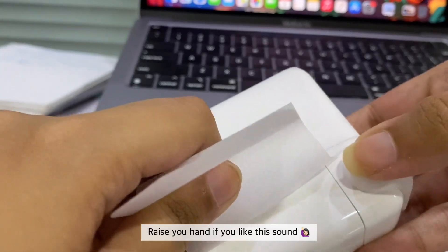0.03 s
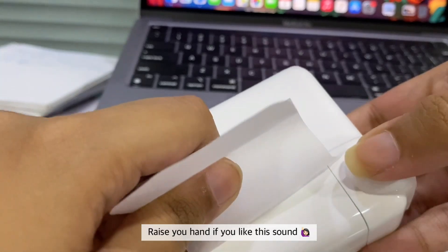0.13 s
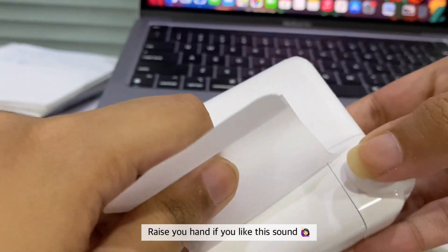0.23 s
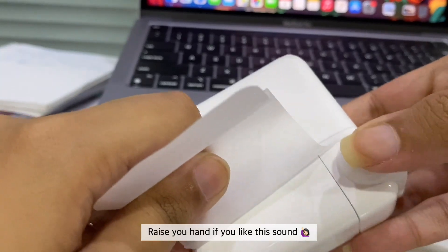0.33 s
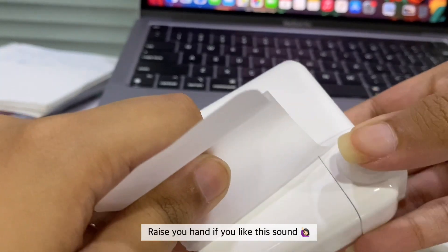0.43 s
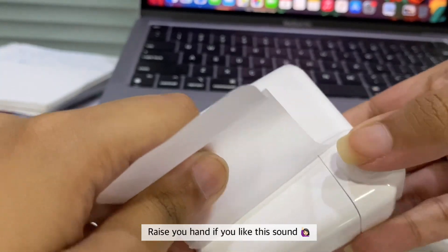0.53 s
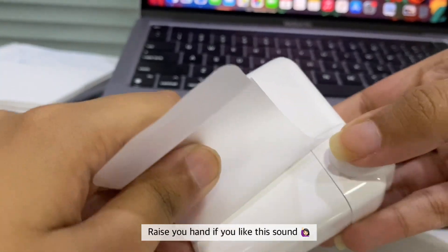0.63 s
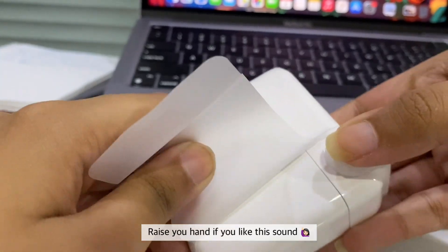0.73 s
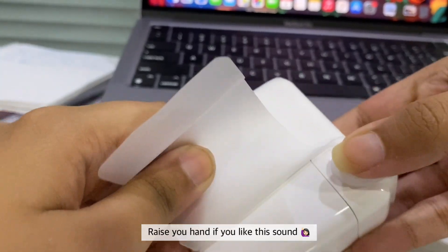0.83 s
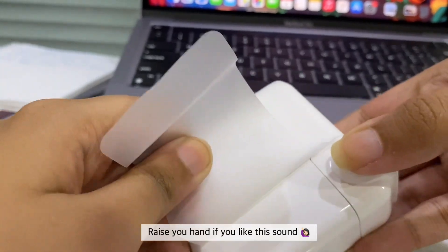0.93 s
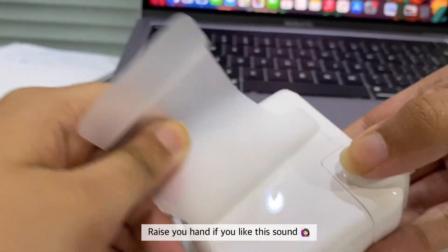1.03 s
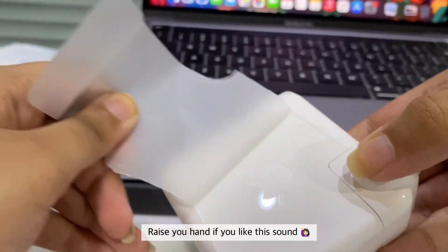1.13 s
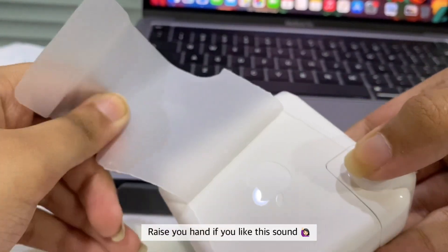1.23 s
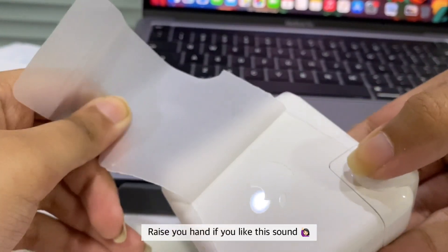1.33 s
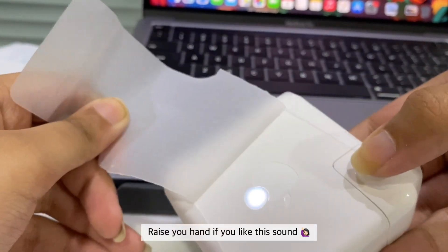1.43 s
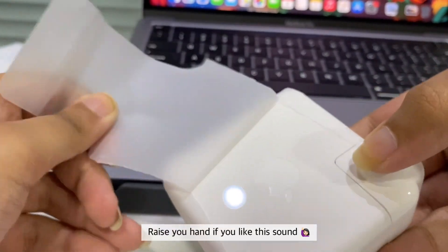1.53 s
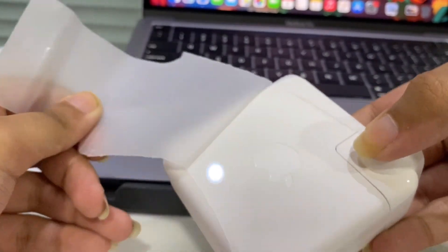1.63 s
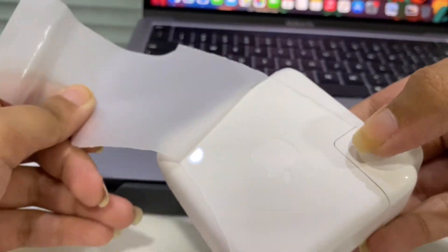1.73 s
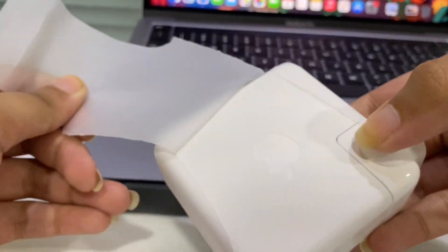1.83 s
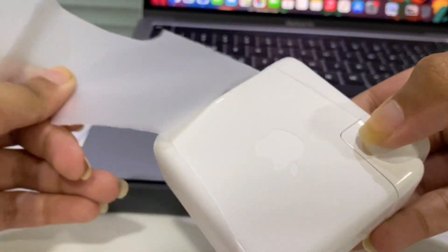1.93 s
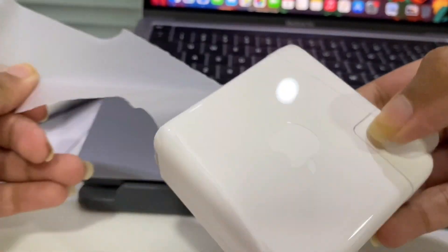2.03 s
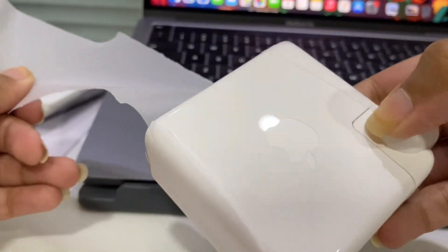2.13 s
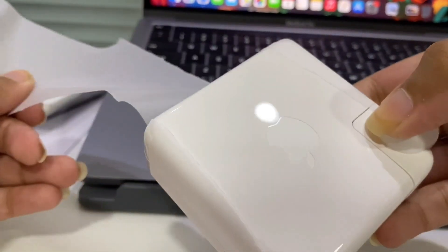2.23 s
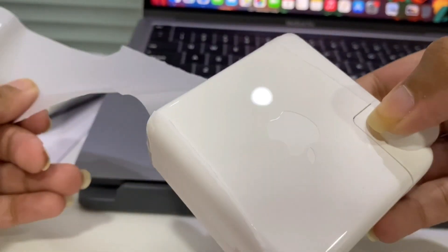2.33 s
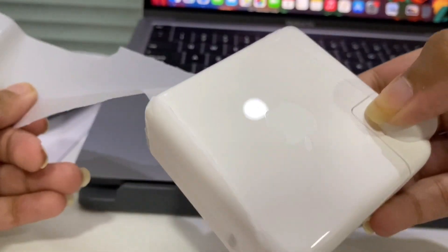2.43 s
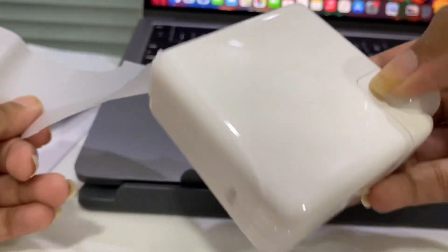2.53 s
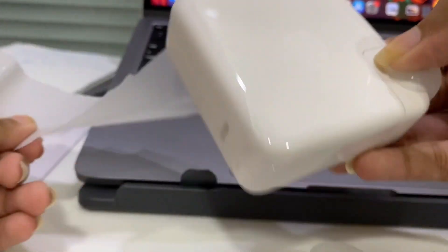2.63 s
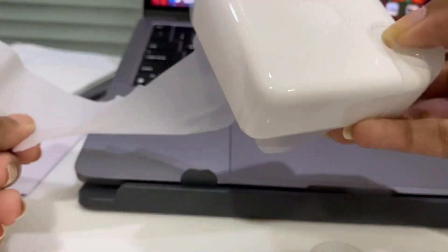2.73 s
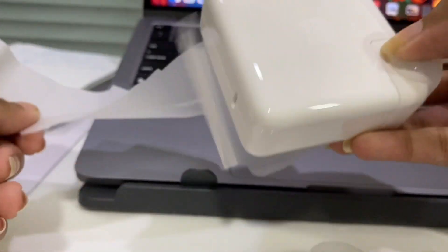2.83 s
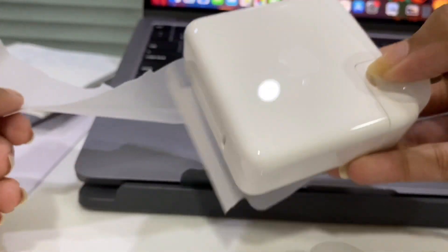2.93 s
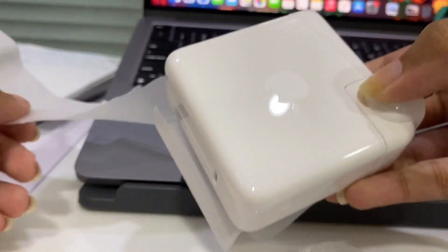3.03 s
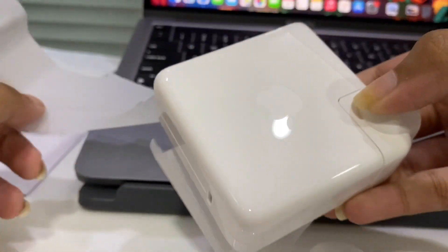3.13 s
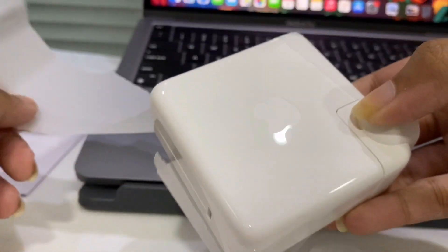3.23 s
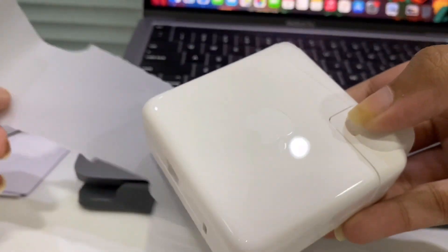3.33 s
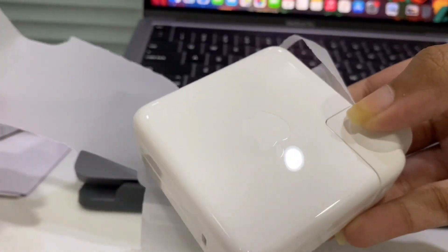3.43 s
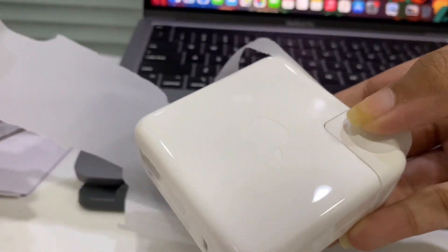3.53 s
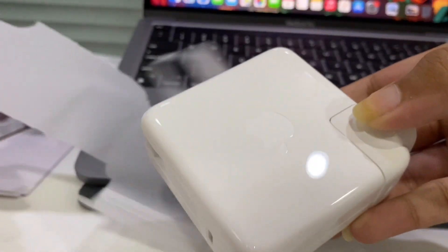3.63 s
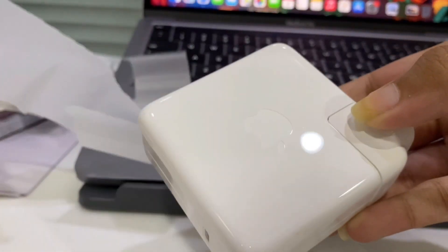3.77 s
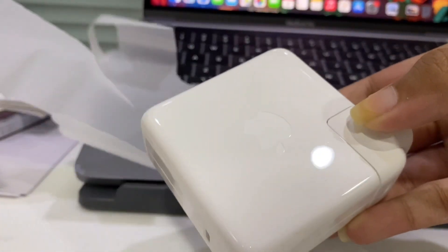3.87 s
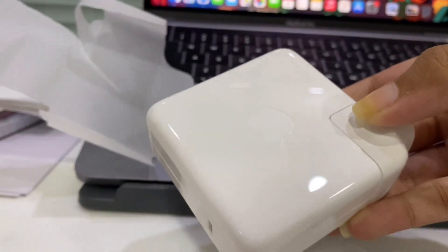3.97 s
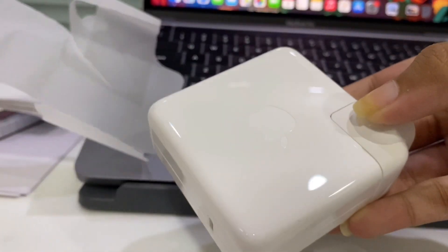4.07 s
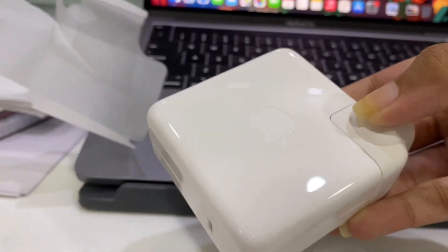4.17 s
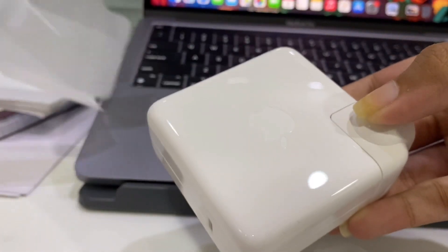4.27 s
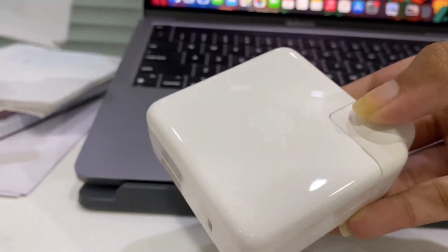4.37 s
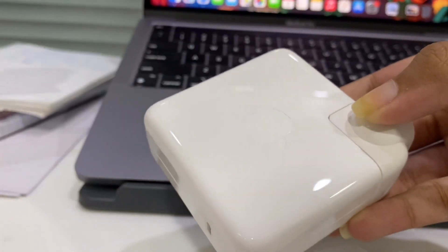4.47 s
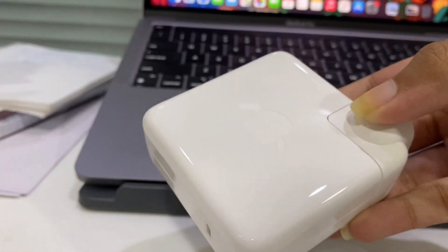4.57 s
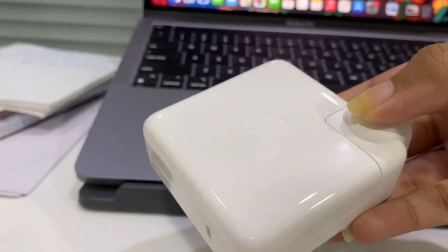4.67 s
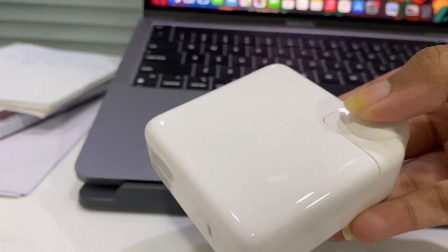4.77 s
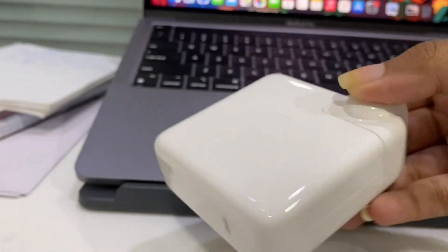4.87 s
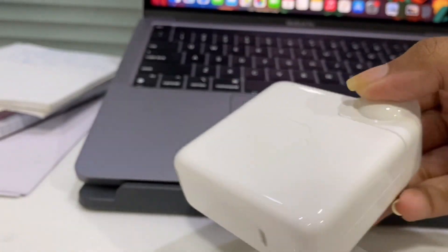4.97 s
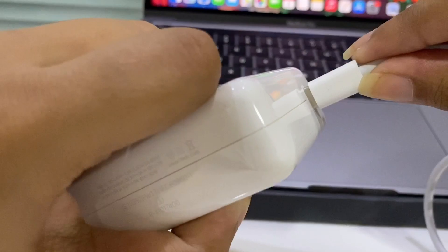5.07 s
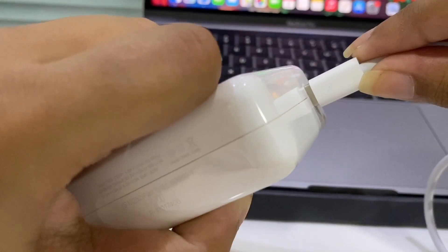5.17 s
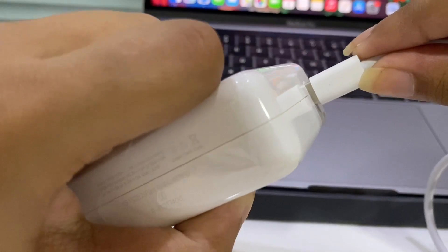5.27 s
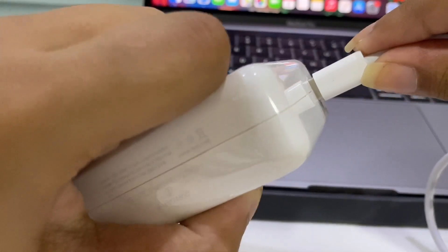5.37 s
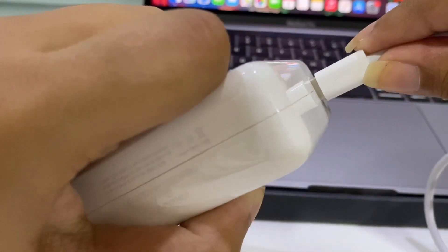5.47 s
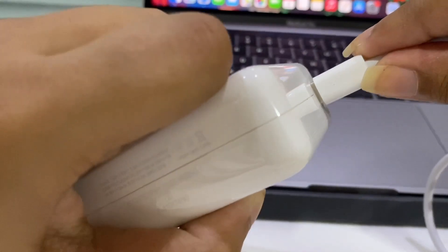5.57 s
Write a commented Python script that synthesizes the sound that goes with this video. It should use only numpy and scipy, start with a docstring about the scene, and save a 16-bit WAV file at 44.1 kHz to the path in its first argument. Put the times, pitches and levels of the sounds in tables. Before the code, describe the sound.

Close, crisp rips and crinkles of plastic film peeling from a charger in bursts, then softly rubbing away in a quiet room.

```python
"""Stiff protective film, peeled by hand off a plastic power adapter, close to a phone microphone.
The glue lets go in tiny slips that run together into rips; each slip sends a bending wave through
the sheet. The film sings and drums under the pull, buckles once with a wobble, snaps as it comes
free and slides away over the case. The place is a desk in a small room, with quick echoes, a faint
bright tail and a soft, fan-like drone behind."""
import sys
import numpy as np
from scipy import signal
from scipy.fft import rfft, irfft
from scipy.io import wavfile

SR = 44100
rng = np.random.default_rng(int(sys.argv[2]) if len(sys.argv) > 2 else 0)


def wav_out(sig):
    """Save sig, one row per channel (or a flat mono array), as 16-bit PCM at SR to the path in sys.argv[1]."""
    wavfile.write(sys.argv[1], SR, np.round(np.clip(np.atleast_2d(sig).T, -1, 1) * 32767).astype(np.int16))


N = 247048

# strength of each pull on the film, close to the microphone: t/s, level/dB
LIFT = [(.765, -40.5), (.79, -37), (.805, -26), (.84, -29), (.87, -38.5), (.91, -40)]
FIRST_RIP = [(.983, -13.5), (1.012, -17.5), (1.03, -13.5), (1.1, -18), (1.13, -23), (1.15, -30.5),
             (1.175, -52.5)]
SLOW_PULL = [(1.38, -40.5), (1.425, -48), (1.475, -40), (1.52, -30), (1.55, -22.5), (1.59, -28),
             (1.62, -37), (1.67, -43.5), (1.72, -51.5)]
CREEP = [(1.785, -48), (1.81, -30.5), (1.86, -32), (1.875, -42), (1.925, -34)]
CORNER_RIP = [(1.925, -34), (1.942, -15.5), (1.965, -17.5), (1.985, -21.5), (2.003, -33), (2.03, -44)]
LOOSEN = [(2.41, -56), (2.436, -34), (2.46, -40), (2.495, -59.5)]
SIDE_RIP = [(2.52, -41.5), (2.555, -28), (2.58, -24), (2.603, -17), (2.63, -22.5), (2.66, -25.5),
            (2.695, -28), (2.712, -41.5)]
LAST_TUG = [(3.275, -27), (3.3, -30), (3.32, -39.5), (3.335, -31.5), (3.35, -70)]
# how the glue lets go: pull, top rate/(slips/s), body/dB, treble/dB, unevenness/dB, rattle/s
PULLS = [(LIFT, 190, -2, 2, 2.4, 0.0016), (FIRST_RIP, 420, -4, -.5, 2, 0.0017),
         (SLOW_PULL, 170, 2, -1.5, 5.04, 0.0018), (CREEP, 190, -1, 0, 4, 0.0023),
         (CORNER_RIP, 350, -10, 0.95, 6.3, .002), (LOOSEN, 220, 4, 0.97, 3.2, 0.0031),
         (SIDE_RIP, 400, -1.2, 1, 4, .0014), (LAST_TUG, 260, 6.5, -2, 5.7, 0.0027)]
def peel(pull, slips_per_s, body_db, treble_db, uneven_db, ring_s, fizz_db=-11, half_rate_db=19):
    """The glue line sticks and slips, faster under a stronger pull. Glue threads fizz in between."""
    start, db = follow(pull)
    slack_db = db.max() - db
    rate = slips_per_s * 2 ** (-slack_db / half_rate_db)
    body = body_db + 0.22 * slack_db  # a weaker pull has more body
    slips_so_far = np.cumsum(rate) / SR
    chance = rng.uniform(-1, 1, (512, 2))
    out = np.zeros(N)
    for k in range(int(slips_so_far[-1])):
        shift, strength = chance[k]
        i = min(np.searchsorted(slips_so_far, k + .5 + .45 * shift), len(db) - 1)
        s = start + i / SR
        size = amp(db[i] + uneven_db * strength) * np.sqrt(SR / rate[i])
        add(out, s, size * crack(s, body[i], treble_db, ring_s, spread_s=0.001644))
    threads = grainy_noise(len(db), per_s=1800, depth_db=4.5)
    add(out, start, amp(db + fizz_db) * shaped(threads, FILM))
    return out


def crack(s, body_db, treble_db, ring_s, spread_s, size=1024):
    """One release of the film, energy 1: a short rattle of bending waves whose bass arrives late."""
    t, hz = np.arange(size) / SR, np.fft.rfftfreq(size, 1 / SR)
    envelope = np.exp(-(t / ring_s) ** 2) + amp(-12) * np.exp(-t / 0.0038)
    rattle = rng.standard_normal(size) * envelope
    body_share = read([(400, 0.67), (900, 0.58), (2100, 0.99), (3200, 0)], hz)
    treble_share = read([(7500, 0.056), (10000, 0.82)], hz)
    db = sheet_colour(s, hz) + body_db * body_share + treble_db * treble_share
    log_gain = np.log(amp(np.r_[db, db[-2:0:-1]]))
    minimum_phase = np.exp(np.conj(signal.hilbert(log_gain)))[:len(hz)]
    delay = spread_s * (np.sqrt(1000 / (hz + 100)) - np.sqrt(1000 / hz[-1]))
    dispersion = np.exp(-2j * np.pi * np.cumsum(delay) * hz[1])
    wave = irfft(rfft(rattle) * minimum_phase * dispersion)
    return wave / np.linalg.norm(wave)


# the film's own colour at close range: f/Hz, level/dB
FILM = [(100, -16), (300, -4.5), (800, -3.5), (1500, -2), (2400, -2.5), (4200, 1.5), (5500, 0.5),
        (7500, -0.5), (9000, 0), (11000, 1.5), (13000, 3), (15000, -6.5), (16500, -20.5)]
# colour added while it is a short, stiff flap, then as it hangs half peeled: f/Hz, level/dB
FLAP = [(800, 1.5), (1400, 0.5), (2050, -6.5), (3100, 1), (3900, 0.5), (4500, 1.5), (5400, -2),
        (8000, -1.5), (9900, -0.5), (11000, -0.5), (13500, 0), (15000, -2.5)]
HALF_PEELED = [(800, 0.5), (1600, 1), (3000, -6.5), (4000, -1.5), (5300, 0), (6300, -0.5), (7400, 4.5),
               (9700, -2), (11300, 2), (13000, -1.5)]
def sheet_colour(s, hz):
    """The film's spectrum in dB at time s, changing as the free part grows longer."""
    stages_s = [0.86, 1.55, 2]  # still a flap, half peeled, clear of the top face
    flap = np.interp(s, stages_s, [1, 0, 0]) * read(FLAP, hz)
    half = np.interp(s, stages_s, [0, 1, 0]) * read(HALF_PEELED, hz)
    return read(FILM, hz) + flap + half + edge_ripple(s, hz)


# round trips of bending waves from the crease to the edges of the sheet: t/s
EDGE_TRIPS = np.array([.00035, .00062, .00095, .0015, .0023])
def edge_ripple(s, hz, depth=2.0, wander=0.16, wander_hz=2.3):
    """Echoes from the edges colour the sheet; the colour shifts as the crease travels."""
    phases = 2 * np.pi * wander_hz * s + 2 * np.arange(len(EDGE_TRIPS))
    trips = EDGE_TRIPS * (1 + wander * np.sin(phases))
    comb = np.cos(2 * np.pi * np.outer(hz, trips)).sum(1)
    return depth * comb * read([(5000, 0.26), (14000, 0.27)], hz)


# sharp snaps of the film, the last row a faint fingernail tick on the case: t/s, level/dB over 4 ms, body/dB,
# treble/dB, rattle/s
SNAPS = [(0.011, -33.5, -1, -10, 0.0024), (.029, -29.5, -5, -5, .001), (.0345, -31, -12, -5, .003),
         (.1865, -43.5, -9, -1, 0.0079), (0.226, -46.5, -12.5, -4, .005), (0.436, -36.5, 4, -20, 0.0018),
         (0.633, -41.5, 3, 1, 0.00035), (0.652, -44.5, -6, -1, .0006), (.6636, -35, -12, 6.5, 0.0017),
         (0.744, -40, -14, 3, .0012), (.7606, -34.5, 11, 10, .0037), (0.808, -14.5, -12, -4, 0.0048),
         (.85, -20, -6, 3, 0.0045), (0.8783, -14.5, -4.5, 4.5, 0.00071), (0.9823, -9.5, 2, -3, 0.0068),
         (1.1544, -18, -4, 0, 0.003), (1.379, -30, 6, 3, 0.00032), (1.39, -26, 3, -4.5, 0.0037),
         (1.411, -36, -5, -9, 0.0016), (1.4545, -31.5, -12, -2, 0.00075), (1.4713, -30.5, -2.5, 7, 0.00077),
         (1.49, -24, -5, -13, 0.0014), (1.5156, -21, 3, 2.5, .003), (1.526, -16.5, 2, -2, .003),
         (1.545, -20, 0, -2, 0.01), (1.593, -24.5, -5, -8, 0.00051), (1.614, -28, -13.5, -7, .0007),
         (1.6195, -24.5, -2, -8, 0.0045), (1.65, -27, 4, -1, 0.0035), (1.6924, -43, 11, 5, 0.0024),
         (1.76, -35, 0, 5.5, .0006), (1.801, -28.5, 12, -4, 0.0012), (1.822, -24.5, -2, -8, 0.00054),
         (1.8847, -22, 6.5, 6, 0.0073), (1.945, -13, 6, 1.5, .011), (1.9965, -15.5, 6, 1, 0.0038),
         (2.125, -41, 11, -12, 0.0017), (2.435, -34.5, 6.5, 6.5, .003), (2.502, -31, 13, -5, 0.0063),
         (2.545, -16.5, 9, 7, .006), (2.59, -17, 2.5, 5, .002), (2.615, -12.5, -8, -3, 0.0012),
         (2.6636, -18.5, -2, 3, .004), (2.8215, -22, 1.5, -3.5, 0.0038), (2.8423, -26, -3, -10, 0.0013),
         (2.9212, -13.5, -2.5, 4.5, 0.0034), (3.0387, -38, -11, -14, 0.0062),
         (3.0706, -33, 7, 16.5, 0.00029), (3.179, -18, -3, 6.5, 0.00056), (3.259, -32, -9, 11, .0023),
         (3.271, -13.5, 1, 11.5, 0.0054), (3.33, -27.5, 6, 4, 0.0039), (3.485, -28, 14.5, -7, 0.0074),
         (3.566, -39.5, 10, 1, 0.00091), (3.601, -34, 19.5, 14, .005), (3.653, -30.5, 1.5, 3.5, 0.0068),
         (3.685, -34.5, -9, 1, 0.0057), (3.875, -43, 3, 5, 0.006), (3.9086, -43.5, -9, 6, .004),
         (3.948, -46, -4, 8, 0.0041), (4.878, -27.5, 6, 5.5, 0.011), (4.9916, -39, 11.5, 6, 0.0057),
         (5.513, -53, 7.5, -5, 0.0051)]
def snaps(creak_s=0.0055):
    """Single large releases of the film, one fingernail tick and small crinkles, each led in by a faint creak."""
    out, level_scale = np.zeros(N), np.sqrt(.004 * SR)
    for s, db, body_db, treble_db, ring_s in SNAPS + crinkles():
        snap = crack(s, body_db, treble_db, ring_s, spread_s=0.002119)
        add(out, s, amp(db) * level_scale * snap)
        creak = crack(s, body_db, treble_db, creak_s, spread_s=.002)
        creak_db = min(db - 17, -41)
        add(out, s - creak_s, amp(creak_db) * level_scale * creak)
    return out


# faint crinkling in the hands: start t/s, end t/s, level/dB
CRINKLES = [(0.047, .1, -40.5), (0.529, .585, -45.5), (.76, .8, -44.5), (1.697, 1.789, -42.5),
            (2.792, 2.82, -36.5), (3.644, 3.76, -46)]
def crinkles(per_s=45, body_db=0, treble_db=0.5, ring_s=0.0018, uneven_db=2):
    """Rows of small snaps at random moments while the sheet is handled."""
    rows = []
    for start, end, db in CRINKLES:
        chance = rng.uniform(-1, 1, (64, 2))
        for s, (shift, size) in zip(np.arange(start, end, 1 / per_s), chance):
            rows.append((s + .5 * shift / per_s, db + uneven_db * size, body_db, treble_db, ring_s))
    return rows


# narrow, stretched film sings: peak t/s, rise/s, fall/s, level/dB, start f/Hz, end f/Hz, width/Hz
SINGS = [(1.83, .035, 0.09, -40, 1470, 1440, 540), (1.948, .014, .037, -22, 1560, 1530, 510),
         (1.998, 0.011, .016, -33, 1150, 950, 540), (1.977, .04, .04, -26.5, 2640, 2870, 600),
         (2.58, .035, .12, -36.5, 1400, 560, 450), (2.64, .07, 0.062, -18.5, 4500, 4800, 1600),
         (2.6, .024, .024, -19, 11200, 11300, 1560), (2.645, .04, .06, -25, 13000, 12950, 1560)]
def sing(peak, rise, fall, level_db, start_hz, end_hz, width_hz):
    """Slips keep ringing one resonance of the stretched strip, which glides as it changes length."""
    start, db = swell(peak, rise, fall, fade_db=15.5, bend=1.5)
    hz = np.geomspace(start_hz, end_hz, len(db))
    slips = grainy_noise(len(db), per_s=650, depth_db=5.5)
    ring = unit_rms(resonate_twice(slips, hz, width_hz))
    return placed(start, amp(level_db + db) * ring)


# the taut sheet drums under the pull: peak t/s, rise/s, fall/s, level/dB, start f/Hz, end f/Hz
DRUMS = [(.59, .04, .04, -48, 77, 76), (1.07, 0.056, .11, -31, 360.8, 105),
         (1.385, .02, 0.076, -40.5, 105, 125), (1.56, 0.083, 0.092, -35, 135.3, 90),
         (1.83, .06, .07, -42.5, 229.7, 90), (1.96, .018, 0.027, -28, 380, 70),
         (2.62, .05, .1, -39.5, 175, 112.6), (3.28, 0.011, 0.086, -42, 251, 69.7),
         (3.39, .03, .04, -51, 79, 78.6), (3.5, .025, .035, -48, 84, 80.4)]
def drum(peak, rise, fall, level_db, start_hz, end_hz, roughness=2.0):
    """The free sheet booms, lower when it is longer: one wavering tone and a rough rumble round it."""
    start, db = swell(peak, rise, fall, fade_db=12, bend=1.2)
    hz = np.geomspace(start_hz, end_hz, len(db))
    tone = np.sin(2 * np.pi * np.cumsum(hz) / SR) * flicker(len(db), per_s=49, depth_db=4)
    rumble = resonate(rng.standard_normal(len(db)), hz, width_hz=220)
    rumble = resonate(rumble, hz, width_hz=260)
    rumble = shaped(rumble, [(35, -27), (65, 4.5), (1000, 0.5)])
    boom = unit_rms(unit_rms(tone) + roughness * rumble)
    return placed(start, amp(level_db + db) * boom)


# the sheet flexes and pops: t/s, level/dB, stiffness as a factor on pitch
FLEXES = [(.768, -38, 2.1), (.7876, -30.5, 2.05), (0.8081, -21, 1.08), (.8195, -13, 0.93),
          (.8315, -22, 0.94), (0.8414, -25.5, 1.2), (.850, -24.5, 0.95), (0.8636, -30, 0.88),
          (.878, -33.5, 0.81), (1.347, -33.5, 1.01), (1.682, -37, 1.3), (1.885, -36.5, 1.4),
          (2.844, -38.5, 1.54), (2.9245, -31, 1.6)]
# hollow resonances of a flex at stiffness 1: f/Hz, level/dB, t60/s
FLEX_MODES = [(407, 2.5, 0.064), (780, 3.5, 0.018), (1210, -6.5, 0.016), (2130, -13, 0.059)]
# ring of the whole sheet after buckling: f/Hz, level/dB, t60/s
SHEET_MODES = [(74, -6, 0.32), (150, -13, 0.25), (241, -11, 0.25), (336, -6.5, 0.22), (415, -21, 0.31),
               (468, -9, .24), (573, -18, 0.26), (721, -6, 0.22), (830, -11.5, 0.21), (1029, -16, .16)]
def buckle(buckle_s=.826, buckle_db=-14.5):
    """Hollow pops sag in pitch as the sheet flips; the whole sheet rings once as it buckles."""
    t, out = np.arange(SR // 2) / SR, np.zeros(N)
    sagging_time = np.cumsum(1 + .5 * np.exp(-t / .0025)) / SR
    for s, db, stiffness in FLEXES:
        for order, (hz, mode_db, t60) in enumerate(FLEX_MODES):
            swing = np.sin(2 * np.pi * hz * stiffness * sagging_time) * (1 - np.exp(-2 * t * hz))
            gain = amp(db + mode_db) / stiffness ** (2 * order)  # stiffer bends favour the lowest mode
            add(out, s, gain * swing * dying(t, t60))
    for hz, db, t60 in SHEET_MODES:
        swing = np.sin(2 * np.pi * (hz * t + rng.random())) * (1 - np.exp(-t * hz))
        add(out, buckle_s, amp(buckle_db + db) * swing * dying(t, t60))
    return out


# film and fingers slide on the case: peak t/s, rise/s, fall/s, level/dB, treble/dB, ringing 0-1
STROKES = [(.025, 0.018, 0.028, -42.5, 5, 0), (.09, .03, .02, -53, -3, 0.2),
           (.28, .13, .17, -60.5, -0.5, 0.44), (.528, 0.026, 0.023, -35.5, 5.5, 0.18),
           (2.95, 0.021, .04, -42, 10, 0.2), (3.025, 0.046, .06, -41.5, 7.5, 0.27),
           (3.16, .03, 0.12, -43, 5.5, .1), (3.385, 0.072, .05, -43.5, -1, 0.1),
           (3.47, 0.031, .09, -45.5, 3.5, .1), (3.607, 0.019, .016, -40.5, 0, 0),
           (3.692, 0.036, 0.028, -45, -5, 0.3), (3.76, 0.049, 0.089, -55.5, -3, 0.25),
           (3.885, .012, .028, -53, -1, 0.37), (3.955, .013, .02, -53, 1.5, .3),
           (4.07, .03, 0.036, -56.5, 4, 0.53), (4.125, 0.036, 0.016, -53.5, 6, .45),
           (4.175, .006, 0.021, -40.5, 9.5, 0.49), (4.35, 0.057, .1, -67, 10, 0.1),
           (4.61, 0.021, 0.13, -54, 12, .1), (4.91, .03, .06, -46, -3.5, 0),
           (4.995, 0.021, 0.019, -49, -0.5, 0), (5.49, .15, 0.058, -67.5, 6, .1)]
# colour of the friction: f/Hz, level/dB
RUB_COLOUR = [(200, -18), (1000, -3), (2200, -2), (3500, -0.5), (6000, -5), (7500, -3), (10000, -3),
              (12500, 0), (14000, -4.5), (16000, -14)]
# resonances of the sliding sheet: f/Hz, width/Hz, level/dB
RUB_MODES = [(4650, 400, -7), (5640, 450, 0.5), (6700, 260, -1), (8900, 300, -4.5), (12150, 600, -4.5)]
def rub(peak, rise, fall, level_db, treble_db, ringing):
    """One stroke of fine, grainy friction, which partly rings the sheet."""
    start, db = swell(peak, rise, fall, fade_db=11.5, bend=1.4)
    grains = shaped(grainy_noise(len(db), per_s=1300, depth_db=4), RUB_COLOUR)
    ring = sum(amp(mode_db) * resonate_twice(grains, hz, width) for hz, width, mode_db in RUB_MODES)
    friction = unit_rms((1 - ringing) * grains + ringing * unit_rms(ring))
    low = signal.sosfiltfilt(signal.butter(4, 8000, fs=SR, output="sos"), friction)
    treble = amp(treble_db)
    hiss = (low + treble * (friction - low)) / np.sqrt(.5 + .5 * treble ** 2)
    return placed(start, amp(level_db + db) * hiss)


def room(film, count=3, crossfade_hz=5.5):
    """The film sounds directly and through crossfaded room echoes, which keep the tail smooth."""
    turn = 2 * np.pi * crossfade_hz * np.arange(N) / SR
    feeds = (film * np.cos(turn + np.pi * k / count) * np.sqrt(2 / count) for k in range(count))
    return film + sum(signal.fftconvolve(feed, echoes())[:N] for feed in feeds)


# decay of the small room: f/Hz, t60/s
ROOM_T60 = [(150, 0.5), (600, 0.36), (2000, 0.46), (5000, 0.88), (10000, 0.57), (15000, 0.6)]
# colour of the tail off the walls: f/Hz, level/dB
ROOM_COLOUR = [(100, -0.5), (600, -1), (2000, 1), (5000, -6), (10000, -2.5), (15000, -7)]
def echoes(desk_db=-17, near_db=-12, tail_db=-22.5, desk_s=.0093):
    """Desk and laptop nearby answer within milliseconds; the walls leave a faint bright tail."""
    t = np.arange(SR) / SR
    late = np.maximum(t - .005, 0)
    near = rng.standard_normal(SR) * (late > 0) * np.exp(-late / 0.017)
    hz, frame_s, frames = signal.stft(rng.standard_normal(SR) * (t > .012), SR, nperseg=256)
    fall_db = -60 * frame_s / read(ROOM_T60, hz)[:, None]
    frames *= amp(fall_db + read(ROOM_COLOUR, hz)[:, None])
    tail = signal.istft(frames, SR, nperseg=256)[1][:SR]
    response = amp(near_db) * near / np.linalg.norm(near) + amp(tail_db) * tail / np.linalg.norm(tail)
    response[round(desk_s * SR)] += amp(desk_db)
    return response


# colour of the room tone at the microphone: f/Hz, level/dB
AIR = [(15, -78.5), (25, -39.5), (87, -2.5), (263, -14.5), (309, -4), (344, -8), (416, -7), (607, -19),
       (659, -12), (1020, -17), (1440, -21.5), (1740, -22.5), (3430, -34), (12900, -47), (16000, -64)]
# the room's low drone: f/Hz, width/Hz, level/dB
DRONE = [(92, 12, -71.5), (245, 61, -61.5), (310, 32, -61.5), (383.6, 62, -62)]
def room_tone(air_db=-52):
    """Steady room noise with a soft, fan-like drone."""
    drone = sum(amp(db) * unit_rms(resonate_twice(rng.standard_normal(N), hz, width))
                for hz, width, db in DRONE)
    return amp(air_db) * shaped(rng.standard_normal(N), AIR) + drone


def amp(db):
    return 10 ** (np.asarray(db) / 20)


def unit_rms(x):
    return x / np.sqrt(np.mean(x ** 2) + 1e-20)


def read(points, hz):
    """A curve's value at hz, on a logarithmic frequency axis."""
    f, value = np.transpose(points)
    return np.interp(np.log(hz + 1), np.log(f + 1), value)


def follow(pull):
    """Start time of a pull and its level in dB, sample by sample."""
    s, db = np.transpose(pull)
    return s[0], np.interp(np.arange(s[0], s[-1], 1 / SR), s, db)


def swell(peak, rise, fall, fade_db, bend):
    """Start time and dB curve of a gesture: 0 at its peak, -fade_db one rise before, one fall after."""
    t = np.arange(-1.5 * rise, 1.5 * fall, 1 / SR)
    return peak + t[0], -fade_db * np.maximum(-t / rise, t / fall) ** bend


def dying(t, t60):
    """Falls by 60 dB in t60 seconds."""
    return amp(-60 * t / t60)


def add(mix, s, sound):
    part = mix[max(round(s * SR), 0):][:len(sound)]
    part += sound[:len(part)]


def placed(s, sound):
    """A full-length track with the sound starting at time s."""
    out = np.zeros(N)
    add(out, s, sound)
    return out


def shaped(x, spectrum):
    """Gives a steady sound a spectrum, at rms 1."""
    gain = amp(read(spectrum, np.fft.rfftfreq(len(x), 1 / SR)))
    return unit_rms(irfft(rfft(x) * gain, len(x)))


def resonate(x, hz, width_hz):
    """A resonance that follows the curve hz."""
    carrier = np.exp(2j * np.pi * np.cumsum(hz * np.ones(len(x))) / SR)
    pole = np.exp(-np.pi * width_hz / SR)
    return 2 * (carrier * signal.lfilter([1 - pole], [1, -pole], x / carrier)).real


def resonate_twice(x, hz, width_hz):
    """A resonance with steeper skirts."""
    return resonate(resonate(x, hz, width_hz), hz, width_hz)


def flicker(count, per_s, depth_db):
    """A gain that jumps about at random, rms 1."""
    steps = rng.standard_normal(4096)
    wander = np.interp(np.arange(count) * per_s / SR, np.arange(len(steps)), steps)
    return unit_rms(amp(depth_db * wander))


def grainy_noise(count, per_s, depth_db):
    return rng.standard_normal(count) * flicker(count, per_s, depth_db)


def scene():
    """The ripping, snapping and sliding film up close, with the small room behind it."""
    ripping = sum(peel(*row) for row in PULLS) + sum(sing(*row) for row in SINGS)
    sheet = sum(drum(*row) for row in DRUMS) + buckle()
    sliding = sum(rub(*row) for row in STROKES)
    film = snaps() + ripping + sheet + sliding
    return (room(film) + room_tone())[None]


def record(dry, low_cut_hz=45, ceiling=.9, top_hz=16100):
    """The phone microphone cuts the deepest bass, rounds off the highest peaks and limits the band."""
    thinned = signal.sosfilt(signal.butter(2, low_cut_hz, "highpass", fs=SR, output="sos"), dry)
    limited = thinned / (1 + (thinned / ceiling) ** 4) ** (1 / 4)
    lowpass = signal.firwin(255, top_hz, window=("kaiser", 9), fs=SR)
    return signal.oaconvolve(limited, lowpass[None], "same")


dry = scene()
out = record(dry)
wav_out(out)
```